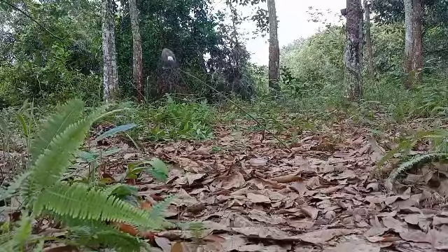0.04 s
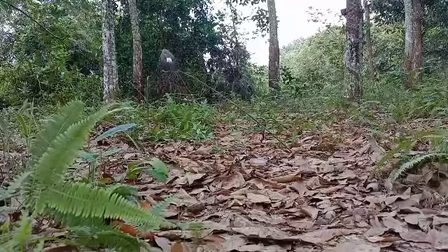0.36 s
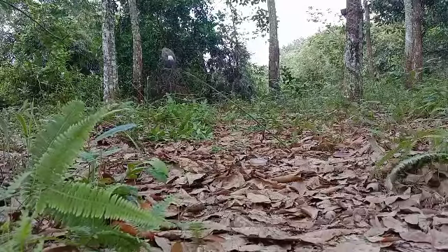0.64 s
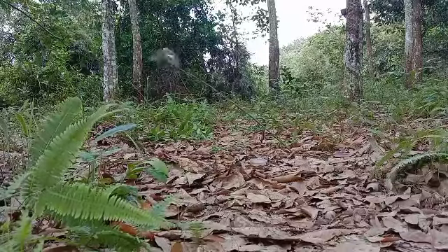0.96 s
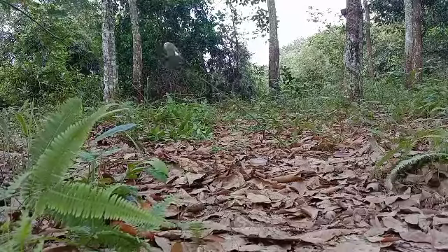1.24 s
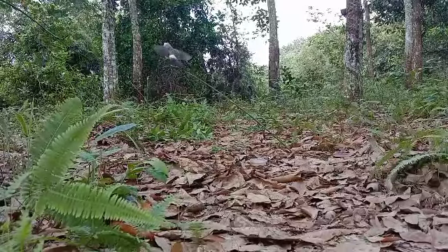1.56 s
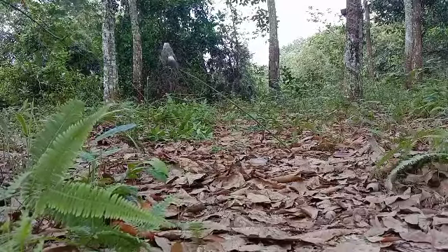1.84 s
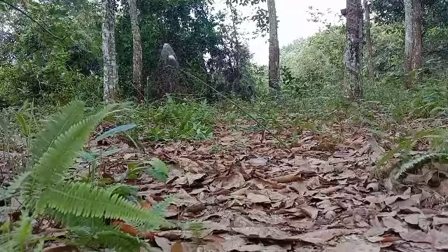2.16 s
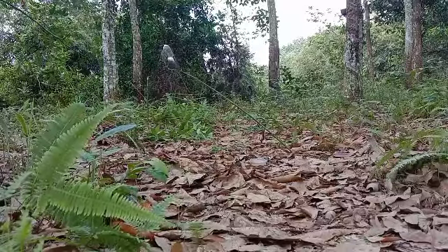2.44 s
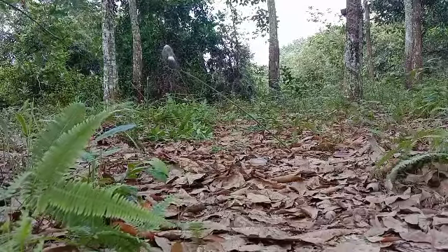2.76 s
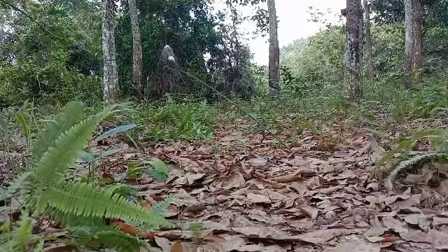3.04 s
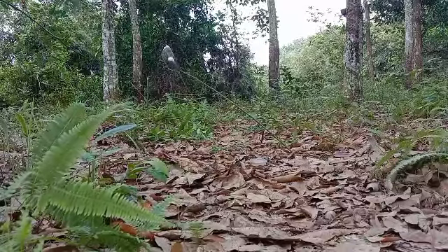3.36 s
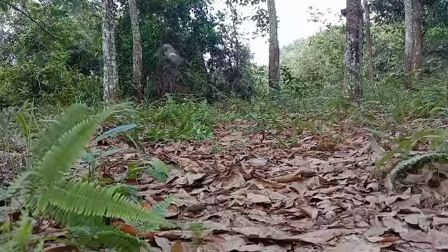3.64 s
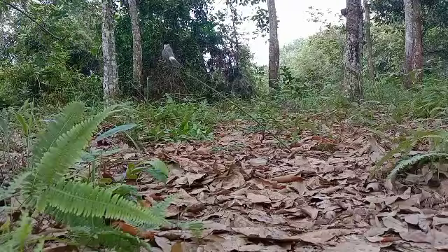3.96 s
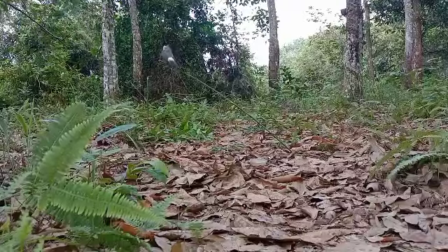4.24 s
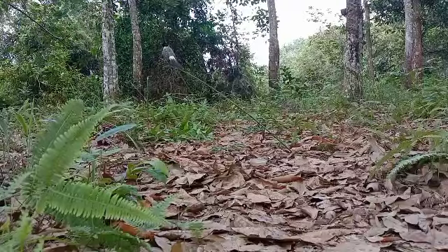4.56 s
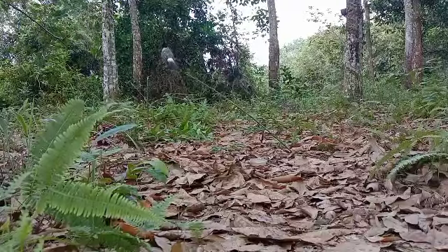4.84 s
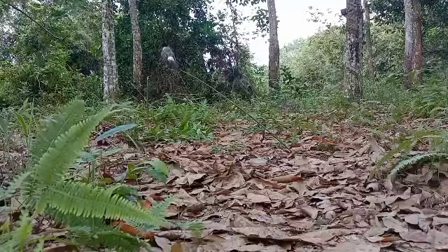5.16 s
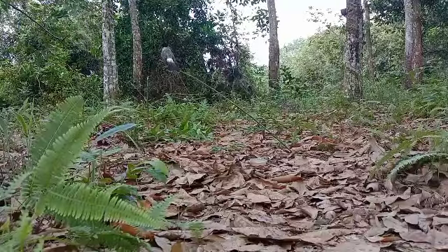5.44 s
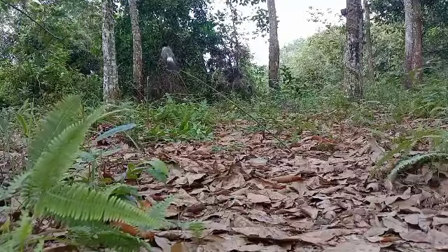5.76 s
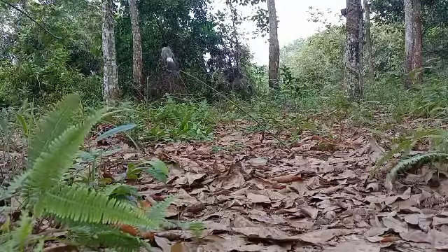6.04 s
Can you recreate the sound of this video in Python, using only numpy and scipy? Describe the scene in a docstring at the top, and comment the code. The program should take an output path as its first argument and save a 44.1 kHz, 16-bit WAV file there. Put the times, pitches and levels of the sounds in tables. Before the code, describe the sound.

In a forest, short bird calls lead to a loud close whistle and bubbling song, with crickets trilling softly behind.

```python
"""Bulbuls at a forest edge. Two crickets trill by wing strokes over insect hiss, faint rumble and soft bumps.
Short rising chucks come first; at 2 s one close bird gives a loud whip and whistle. Repeated phrases
follow: bubbling chatter from 2.5 s, an arched song from 3.4 s, a slow drawl from 4.6 s, while other birds
answer. Each note is a gliding syrinx tone shaped by the throat; trunks and leaves scatter it, the far
ones most. The crickets stop before the last faint drawl."""
import sys
import numpy as np
from scipy import signal
from scipy.fft import rfft, irfft, next_fast_len
from scipy.io import wavfile
from scipy.ndimage import uniform_filter1d

SR = 44100
rng = np.random.default_rng(int(sys.argv[2]) if len(sys.argv) > 2 else 0)


def wav_record(signal):
    """Record a signal, one row per channel, as 16-bit PCM in the file named by sys.argv[1]."""
    frames = np.transpose(np.atleast_2d(signal))
    bounded = np.clip(frames, -1, 1)
    # unit amplitude maps onto the largest positive 16-bit level
    quanta = np.round(bounded * 32767).astype(np.int16)
    wavfile.write(sys.argv[1], SR, quanta)


N = 273420
TIME_S = np.arange(N) / SR


def bulbuls():
    """All birds, coloured by the microphone."""
    # freq_hz, gain_db
    microphone = [(800, 2.5), (1100, -10.5), (1600, 1), (2200, -3), (3000, -0.5), (5000, 2), (5800, 2),
                  (7000, 3), (9000, 2.5), (11300, 0), (12500, -20), (13600, 2), (14800, 7), (15600, 6)]
    birds = loud_call() + phrases() + flock() + chucks()
    size = next_fast_len(N + SR)
    colour = gain_of(at_freq(microphone, np.fft.rfftfreq(size, 1 / SR)))
    return irfft(rfft(birds, size) * colour, size)[:N]


def loud_call(attack_s=.008):
    """Closest bird: a strained falling whip, then a swelling, nearly pure whistle."""
    # time_s, pitch_hz, fundamental_db, octave_db
    whip_curve = [(1.992, 1637, -51, -53), (1.996, 2416, -46, -41), (2.0, 3197, -40, -34),
                  (2.012, 3400, -32, -29), (2.026, 2870, -35, -22), (2.044, 1991, -45, -39),
                  (2.062, 1672, -50.5, -46), (2.072, 1590, -49, -48), (2.082, 1756, -54, -48)]
    # time_s, pitch_hz, level_db
    whistle_curve = [(2.092, 2050, -59), (2.102, 2656, -38.5), (2.11, 2950, -29.5), (2.116, 3000, -26),
                     (2.13, 2540, -30.5), (2.144, 2788, -27.5), (2.178, 3015, -17.5), (2.188, 3030, -25),
                     (2.195, 2900, -41)]
    out = np.zeros(N)
    whip = syrinx(*gesture(whip_curve), jitter=.004, strain_jitter=.012, shimmer_db=.9,
                  third_db=-24, hiss_db=-22)
    whip *= np.clip(np.arange(len(whip)) / SR / attack_s, 0, 1)
    add(out, whip_curve[0][0], among_trees(whip, echo_db=-16))
    hz, db = gesture(whistle_curve)
    whistle = syrinx(hz, db, octave_db=db - 37, jitter=.0036, shimmer_db=.4)
    add(out, whistle_curve[0][0], gain_of(1) * among_trees(whistle, echo_db=-26))
    return out


def phrases():
    """Each phrase returns with the same notes, a little slower every time."""
    # phrase: offset_s, note, level_db, pitch_ratio, echo_db
    phrase_notes = { "chatter": [(0, "warble", -47, 1.0, 1), (.124, "chip", -62, 1.3, 2),
                    (.168, "bubble", -38, 1.01, -5.5)], "song": [(-.003, "burr", -56, 1.45, 3.5),
                    (0, "rasp", -47.5, 1.0, 1), (.047, "high", -43, 1.01, 0),
                    (.173, "dip", -37.5, 1.005, -3)], "drawl": [(-.112, "bubble", -42, .82, -4),
                    (-.003, "chip", -57, .9, -6), (0, "drawl", -52.5, 0.99, -4), (.137, "pip", -52, .99, 0),
                    (.157, "lilt", -36.5, 0.98, -8)], }
    # start_s, phrase, gain_db, length_ratio
    singing = [ (2.543, "chatter", -6, 0.98), (2.825, "chatter", -0.5, 1.018),
               (3.112, "chatter", -0.5, 1.036), (3.438, "song", -1, .98), (3.828, "song", 0, 1.01),
               (4.227, "song", -1, 1.04), (4.754, "drawl", 1.5, 1.0), (5.087, "song", -4.5, 1.051),
               (5.871, "drawl", -17, 1.085), ]
    out = np.zeros(N)
    for start_s, phrase, phrase_db, stretch in singing:
        for offset_s, name, db, pitch_ratio, echo_db in phrase_notes[phrase]:
            sound = among_trees(note(name, pitch_ratio, stretch), echo_db)
            add(out, start_s + offset_s * stretch, gain_of(phrase_db + db) * sound)
    return out


def note(name, pitch_ratio, stretch, release_s=.0088, beak_hz=5485, beak_width_oct=.17):
    """A glide that swells at the throat resonance; the open beak favours its octave."""
    # note: time_s, pitch_hz
    glides = { "warble": [(0, 2972), (.011, 3745), (.029, 3480), (.043, 2540), (.064, 3350), (.093, 2250),
              (.104, 2170)], "bubble": [(0, 1977), (.015, 2630), (.040, 1773), (.064, 2873), (.073, 2950),
              (.084, 2837)], "chip": [(0, 3150), (.013, 2696), (.021, 2440)], "pip": [(0, 2753),
              (.012, 3013), (.042, 2774)], "rise": [(0, 2974), (.025, 3445), (.046, 4080)],
              "rasp": [(0, 3400), (.010, 4400), (.038, 4800)], "high": [(0, 4550), (.018, 3900),
              (.040, 3888), (.049, 2765), (.060, 4450), (.072, 4400), (.090, 3788)], "dip": [(0, 2540),
              (.012, 3340), (.036, 3650), (.052, 4220), (.075, 2078), (.085, 2094), (.096, 3100),
              (.106, 3330), (.129, 2966), (.141, 2310)], "drawl": [(0, 2400), (.014, 3510), (.026, 2868),
              (.043, 2815), (.063, 2147), (.088, 2170), (.108, 1480), (.125, 1610), (.158, 1516)],
              "lilt": [(0, 1700), (.013, 2834), (.022, 2833), (.040, 2480), (.064, 2860), (.078, 2830)], }
    # note: throat_hz, half_width_oct, octave_start_db, octave_end_db, attack_s, jitter_ratio
    voicing = { "warble": (3250, .11, -9, -24, .016, .014), "bubble": (2989, .07, -14, -22, .009, .012),
               "chip": (2900, 0.17, 9.8, 9.1, .009, .01), "pip": (3003, 0.18, -32, -25, .009, .008),
               "rise": (3708, 0.8, -20, -20, .02, .035), "rasp": (4500, .25, -22, -26, .008, .055),
               "high": (4149, .12, -25, -22, .02, .018), "dip": (3388, .15, -42, -17, .02, .014),
               "drawl": (2899, .5, 1, -26, .014, .016), "lilt": (2873, 0.04, -33, -35.5, .018, .006), }
    if name == "burr":  # a high, rough chuck
        return chuck(pitch_ratio, .87 * stretch, tilt_db_per_oct=5.5, jitter=.06)
    hz = pitch_ratio * gesture(glides[name], stretch)[0]
    throat_hz, width_oct, start_db, end_db, attack_s, jitter = voicing[name]
    fundamental_db = resonance_db(hz, throat_hz, width_oct)
    octave_db = np.linspace(start_db, end_db, len(hz)) + resonance_db(2 * hz, beak_hz, beak_width_oct)
    t = np.arange(len(hz)) / SR
    envelope = np.clip(np.minimum(t / attack_s, (t[-1] - t) / release_s), 0, 1)
    return envelope * syrinx(hz, fundamental_db, octave_db, jitter, shimmer_db=2.2)


def syrinx(hz, fundamental_db, octave_db, jitter, shimmer_db,
           strain_jitter=.041, third_db=-26, hiss_db=-24):
    """Gliding whistle; strain stresses the octave, shakes the pitch, adds overtones, rasp and hiss."""
    # freq_hz, density_db
    hiss_spectrum = [(700, -46.5), (1600, -13.5), (3500, -12), (5500, -9), (6800, -2.5), (8500, -8.5),
                     (12000, -13), (15000, -12)]
    size = len(hz)
    fundamental, octave = gain_of(fundamental_db), gain_of(octave_db)
    strain = octave / (fundamental + octave)
    shake = jitter * drift(size, 280) + strain_jitter * strain * drift(size, 460)
    phase = 2 * np.pi * np.cumsum(hz * (1 + shake)) / SR
    tone = fundamental * np.sin(phase) + octave * np.sin(2 * phase)
    third = octave * gain_of(third_db) + fundamental * gain_of(-56)
    for k in range(3, 7):
        tone += third * gain_of(-2 * (k - 3)) * np.sin(k * phase) * (k * hz < SR / 2)
    tone += octave * gain_of(-28) * drift(size, 2200) * np.sin(2 * phase)  # rasp
    tone += octave * gain_of(hiss_db) * noise(hiss_spectrum, size)
    shimmer = gain_of(shimmer_db * drift(size, 140))
    return np.sqrt(2) * tone * shimmer * signal.windows.tukey(size, .05)


def resonance_db(hz, centre_hz, width_oct):
    """A tone weakens as it glides away from a resonance."""
    return -13.5 * np.log10(1 + (np.log2(hz / centre_hz) / width_oct) ** 2)


def chucks():
    """Single chucks from near and far perches."""
    # start_s, level_db, pitch_ratio, length_ratio, tilt_db_per_oct, echo_db
    calls = [ (0.428, -75, .83, 1.47, -5, 5), (0.711, -69, .96, 1.5, 3, 8),
             (1.176, -46.5, 1.0, 0.97, 1.5, -15), (1.577, -46.5, 0.99, 1.23, 2.5, -18.5),
             (1.889, -42.5, 1.016, 1.24, 4.5, -16), (2.52, -40, 0.98, 1.25, 3, -23),
             (3.258, -40.5, 0.96, 0.99, 6.5, -9), (3.477, -47, .88, 1.1, -4, -17),
             (4.272, -70, 0.93, 1.55, -12.5, 7), (5.285, -66.5, 0.92, 1.57, -11.5, 1),
             (6.098, -71.5, .94, 1.43, -2, 11.5), ]
    out = np.zeros(N)
    for start_s, db, pitch_ratio, stretch, tilt, echo_db in calls:
        add(out, start_s, gain_of(db) * among_trees(chuck(pitch_ratio, stretch, tilt), echo_db))
    return out


def chuck(pitch_ratio, stretch, tilt_db_per_oct, jitter=.03):
    """Rising buzz through the throat; late on, strong and weak pulses alternate, adding half harmonics."""
    # time_s, pitch_hz, level_db, half_harmonic_ratio
    curve = [(0, 1078, -7.5, 0), (.006, 1422, -3.5, 0.2), (.011, 1617, 1.5, 0.16), (.020, 1703, -2, 0),
             (.026, 1780, -2, .7), (.034, 1875, -16, .9)]
    # freq_hz, gain_db
    throat = [(650, -26), (850, -12.5), (1100, -6), (1700, -10), (2500, -3.5), (3300, 0.5), (4100, -16.5),
              (5000, -23.5), (6600, -23.5), (8300, -33.5), (11000, -45.5), (15000, -49)]
    hz, db, half_ratio = gesture(curve, stretch)
    hz = hz * pitch_ratio
    phase = 2 * np.pi * np.cumsum(hz * (1 + jitter * drift(len(hz), 730))) / SR
    tone = np.zeros(len(hz))
    for k in range(1, 19):
        partial_hz = k * hz / 2
        tilt_db = tilt_db_per_oct * np.log2(np.maximum(partial_hz, 1400) / 3200)
        colour = gain_of(at_freq(throat, partial_hz) + tilt_db)
        tone += colour * np.sin(k * phase / 2) * (half_ratio if k % 2 else 1)
    return np.sqrt(2) * tone * gain_of(db) * signal.windows.tukey(len(hz), .25)


def flock(chips_start_s=2.56, chips_end_s=3.46, chips_per_s=20):
    """Other birds answer with single notes and chip at random during the chatter."""
    # start_s, note, level_db, pitch_ratio, length_ratio, echo_db
    answers = [ (1.783, "bubble", -64, 0.96, 0.77, -3), (2.317, "high", -55, 1.02, 1.0, 3),
               (2.424, "rise", -58, 0.69, 1.86, 6), (2.547, "chip", -57, 1.25, 1.14, 8),
               (2.956, "chip", -47, 1.09, .9, -6), (3.216, "rise", -53, 1.07, 1.0, 2),
               (3.43, "warble", -54, 1.01, .85, 0), (4.986, "pip", -53, .77, 1.3, 0),
               (5.110, "pip", -58.5, 0.93, .9, 5), (5.191, "pip", -53, 0.75, 1.9, 2), ]
    out = np.zeros(N)
    for start_s, name, db, pitch_ratio, stretch, echo_db in answers:
        add(out, start_s, gain_of(db) * among_trees(note(name, pitch_ratio, stretch), echo_db))
    for start_s in np.arange(chips_start_s, chips_end_s, 1 / chips_per_s):
        late, loud, high = 2 * rng.random(3) - 1
        chip = among_trees(note("chip", 1 + .3 * high, stretch=1.5), echo_db=6)
        add(out, start_s + .5 * late / chips_per_s, gain_of(-67 + 5 * loud) * chip)
    return out


def among_trees(sound, echo_db, screen=.8, screen_hz=4500):
    """Direct plus scattered sound. From deeper perches echoes follow sooner and leaves screen treble."""
    size = next_fast_len(len(sound) + SR // 2 + 512, real=True)
    direct = rfft(sound, size)
    gap_s = np.clip(.0034 * gain_of(-echo_db / 2), .002, .015)
    echo = direct * rfft(forest_response(gap_s), size)
    echo *= gain_of(echo_db) * np.sqrt(np.sum(abs(direct) ** 2) / np.sum(abs(echo) ** 2))
    hz = np.fft.rfftfreq(size, 1 / SR) + 1
    treble = 1 - 1 / (1 + (hz / screen_hz) ** 10)
    leaf_loss = 1 + screen * gain_of(echo_db) * treble
    ground = 1 / (1 + .5 * gain_of(1.4 * echo_db) * (1000 / hz) ** 12)  # litter absorbs far birds' lows
    return irfft((direct / leaf_loss + echo) * ground, size)


def forest_response(gap_s, early_decay_s=.013, tail_db=-10, spread_db=4, echoes_per_s=1200):
    """A quick cluster of uneven echoes from near trunks, then a thin long tail."""
    # freq_hz, t60_s
    ring_times = [(1000, 0.67), (3200, 0.55), (6000, 0.68), (14000, .4)]
    t = np.arange(SR // 2) / SR
    taps = rng.choice([-1, 1], len(t)) * gain_of(spread_db * rng.standard_normal(len(t)))
    taps *= rng.random(len(t)) < echoes_per_s / SR
    taps *= np.clip(t / gap_s - 1, 0, 1)
    hz, frame_s, spectra = signal.stft(taps, SR, nperseg=256)
    early = np.exp(-np.maximum(frame_s - gap_s, 0) / early_decay_s)
    tail = gain_of(tail_db - 60 * frame_s / at_freq(ring_times, hz)[:, None])
    return signal.istft(spectra * (early + tail), SR, nperseg=256)[1]


def crickets():
    """One near cricket, one slower and farther off."""
    # start_s, end_s, level_db
    near_bouts = [(-.1, 0.725, -60), (1.14, 5.77, -57.5)]
    # start_s, end_s, level_db
    far_bouts = [(-.1, .8, -68), (.85, 5, -64)]
    near = cricket(near_bouts, pitch_hz=4763, period_s=.0437, pair_s=.012)
    far = cricket(far_bouts, pitch_hz=4680, period_s=.062, pair_s=.015)
    return near + far


def cricket(bouts, pitch_hz, period_s, pair_s, stroke_s=.015, sag=.06, spread_db=1.7, fade_s=.082):
    """The wings close twice a chirp; each stroke is a short tone that sags in pitch."""
    progress = np.linspace(0, 1, round(stroke_s * SR))
    trill = np.zeros(N)
    for start_s in np.arange(pair_s, N / SR, period_s):
        late, sharp, first, second = rng.standard_normal(4)
        cycles = np.cumsum(pitch_hz * (1 + .0061 * sharp + sag * (.5 - progress))) / SR
        stroke = np.sqrt(2) * np.sin(np.pi * progress) ** 2 * np.sin(2 * np.pi * cycles)
        add(trill, start_s + .0016 * late, gain_of(spread_db * first - 3) * stroke)
        add(trill, start_s + .0023 * late + pair_s, gain_of(spread_db * second) * stroke)
    gate = sum(gain_of(db) * np.clip(np.minimum(TIME_S - start_s, end_s - TIME_S) / fade_s, 0, 1)
               for start_s, end_s, db in bouts)
    return among_trees(trill, echo_db=-5, screen=0)[:N] * gate


def insects(level_db=-68.5, flutter_db=.7):
    """Many small insects merge into a hiss that swells and sinks."""
    # freq_hz, density_db
    spectrum = [(3060, -51.5), (5200, -9.5), (5290, -5), (6400, -12), (6530, 0), (6940, 8), (7430, -12),
                (7540, -1.5), (7950, -9), (8750, -10), (9810, -7), (10800, 5), (11300, -5.5), (11900, -28),
                (12200, -35), (15900, -66.5), (22000, -120)]
    # time_s, gain_db
    swell = [(0, -3), (1.4, -4), (2.5, 3), (4.5, 1.5), (5.4, 0), (5.7, -4.5), (6.2, -3.5)]
    return gain_of(level_db + flutter_db * drift(N, 30)) * gain_curve(swell) * noise(spectrum)


def bumps():
    """Dull low pushes that die within a few cycles."""
    # start_s, level_db, pitch_hz, decay_s
    pushes = [(.476, -53, 104, 0.0064), (.642, -68, 75, 0.0045), (2.54, -68, 270, .004),
              (3.35, -71, 66, 0.012), (3.49, -73, 88.5, 0.01), (3.909, -68, 78, 0.011),
              (4.12, -70, 75, 0.011)]
    out, t = np.zeros(N), np.arange(SR // 4) / SR
    for start_s, db, hz, decay_s in pushes:
        envelope = t / decay_s * np.exp(1 - t / decay_s)
        add(out, start_s, gain_of(db) * envelope * np.sin(2 * np.pi * hz * t))
    return out


def background(air_db=-78):
    """Still air and a slow swell of low rumble."""
    # freq_hz, density_db
    air_spectrum = [(20, -22), (45, -4), (80, -4), (170, -1.5), (300, -10), (600, -20.5), (1000, -10),
                    (1500, -5.5), (2200, -16.5), (3500, -6.5), (4150, -19), (5000, -2.5), (12000, -21.5),
                    (15500, -20)]
    rumble_spectrum = [(25, -18.5), (75, -2), (160, -3), (350, -15), (900, -20.5), (2500, -68.5)]
    # time_s, level_db
    swell = [(0, -85.5), (1.6, -86.5), (2.4, -78.5), (3.4, -79.5), (4.1, -81.5), (5.0, -82.5), (6.2, -90)]
    return gain_curve(swell) * noise(rumble_spectrum) + gain_of(air_db) * noise(air_spectrum)


def gesture(rows, stretch=1):
    """Breakpoint columns as smooth per-sample curves."""
    time_s, *columns = np.transpose(rows)
    time_s = (np.sort(time_s) - time_s.min()) * stretch
    t = np.arange(0, max(time_s[-1], .01), 1 / SR)
    return [uniform_filter1d(np.interp(t, time_s, column), size=130) for column in columns]


def drift(size, rate_hz):
    """Smooth random wander, about unit RMS."""
    span = next_fast_len(size + 4096, real=True)
    lowpass = np.exp(-(np.fft.rfftfreq(span, 1 / SR) / rate_hz) ** 2)
    return unit_rms(irfft(rfft(rng.standard_normal(span)) * lowpass, span))[:size]


def noise(spectrum, size=N):
    """Shaped noise, unit RMS."""
    colour = gain_of(at_freq(spectrum, np.fft.rfftfreq(size, 1 / SR)))
    return unit_rms(irfft(rfft(rng.standard_normal(size)) * colour, size))


def at_freq(points, hz):
    """Interpolate over log frequency."""
    points_hz, values = np.transpose(points)
    return np.interp(np.log(hz + 1), np.log(points_hz + 1), values)


def gain_curve(points):
    return gain_of(np.interp(TIME_S, *np.transpose(points)))


def gain_of(db):
    return 10 ** (np.asarray(db) / 20)


def unit_rms(x):
    return x / np.sqrt(np.mean(x ** 2) + 1e-20)


def add(mix, start_s, sound):
    part = mix[max(round(start_s * SR), 0):][:len(sound)]
    part += sound[:len(part)]


def scene():
    """Mono mix."""
    return (bulbuls() + crickets() + insects() + bumps() + background())[None]


def record(dry):
    """Steep low-pass."""
    cutoff_hz = 15550
    lowpass = signal.firwin(511, cutoff_hz, window=("kaiser", 9), fs=SR)
    return signal.oaconvolve(dry, lowpass[None], "same")


dry = scene()
out = record(dry)
wav_record(out)
```